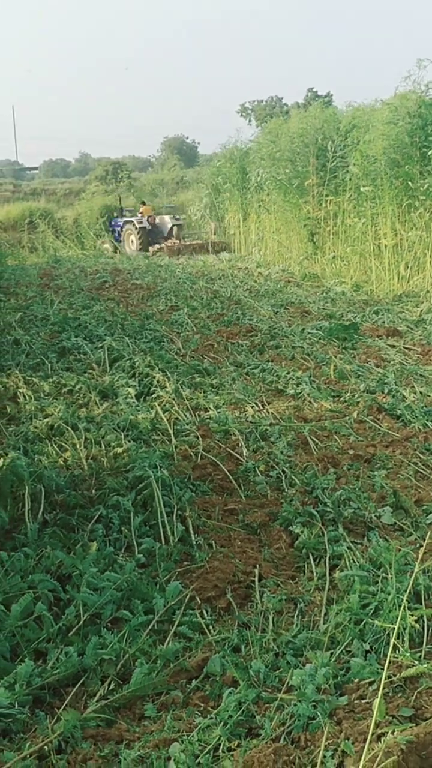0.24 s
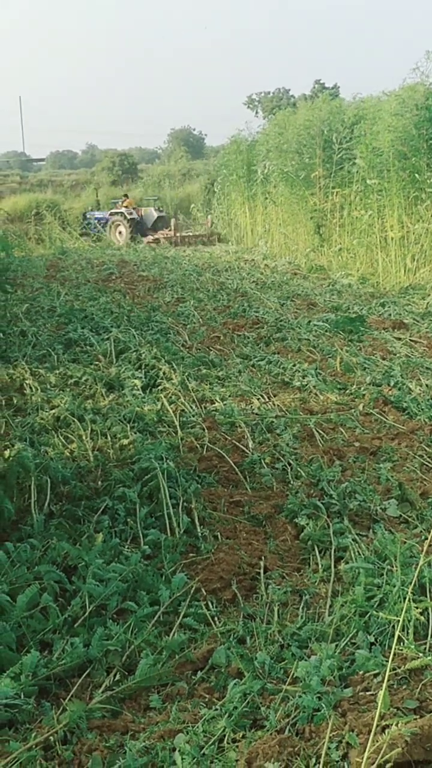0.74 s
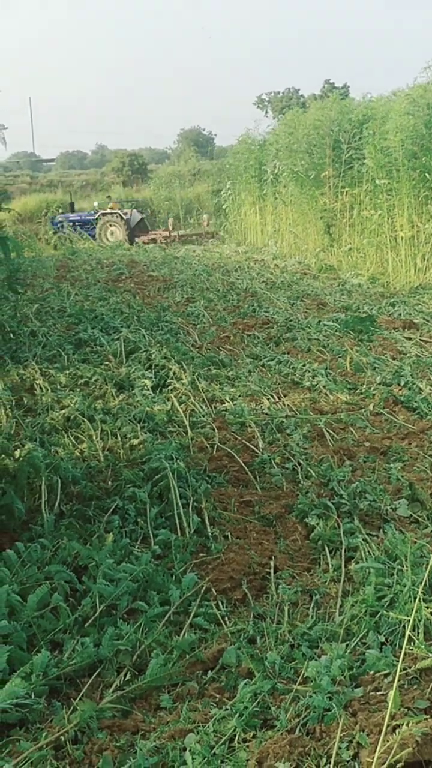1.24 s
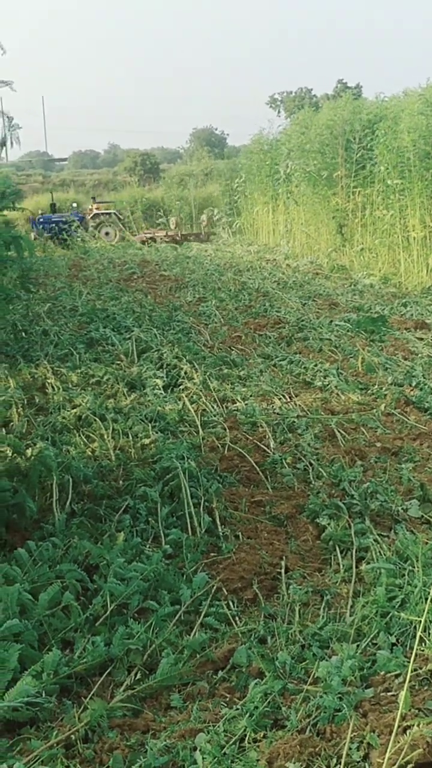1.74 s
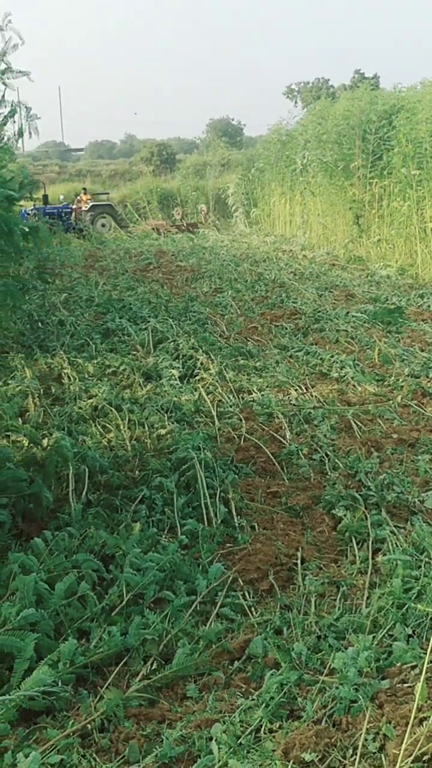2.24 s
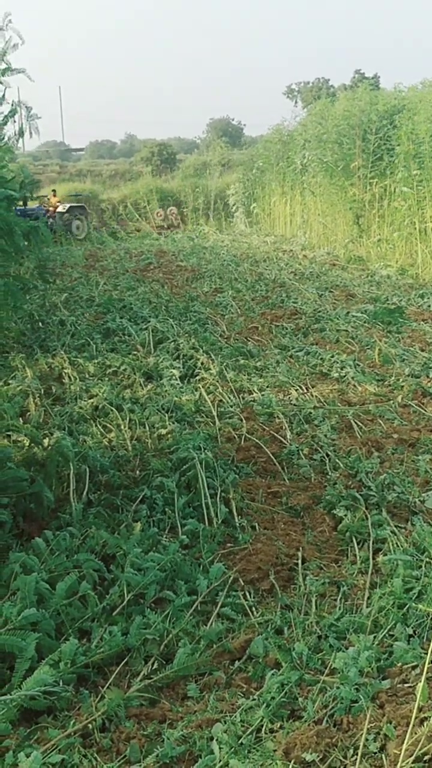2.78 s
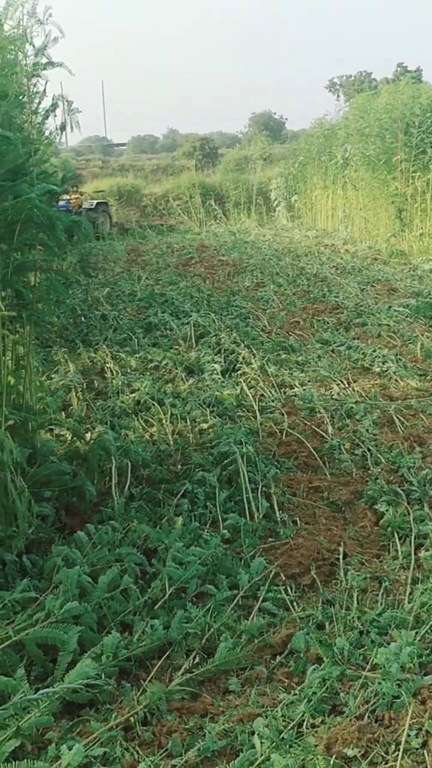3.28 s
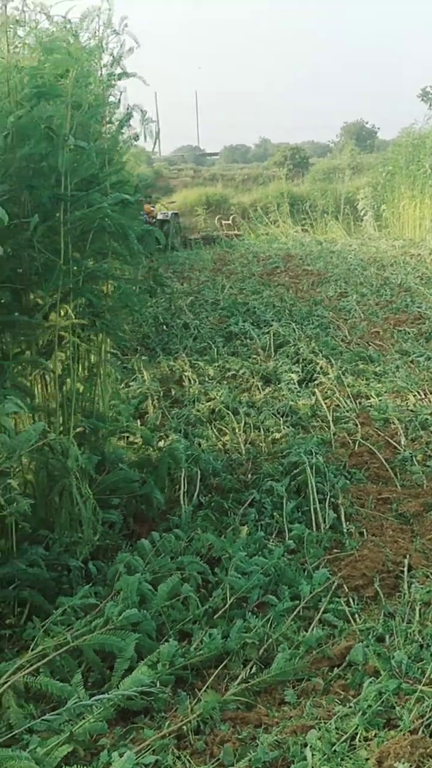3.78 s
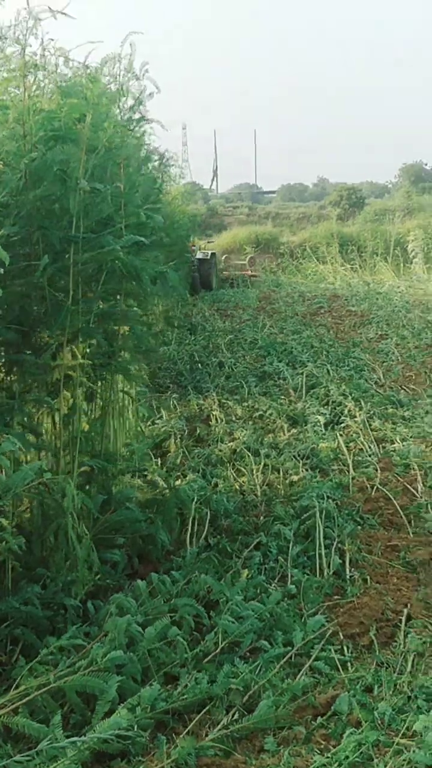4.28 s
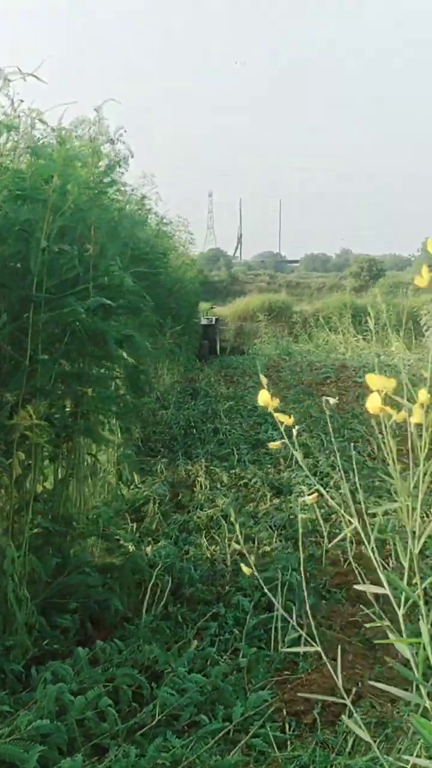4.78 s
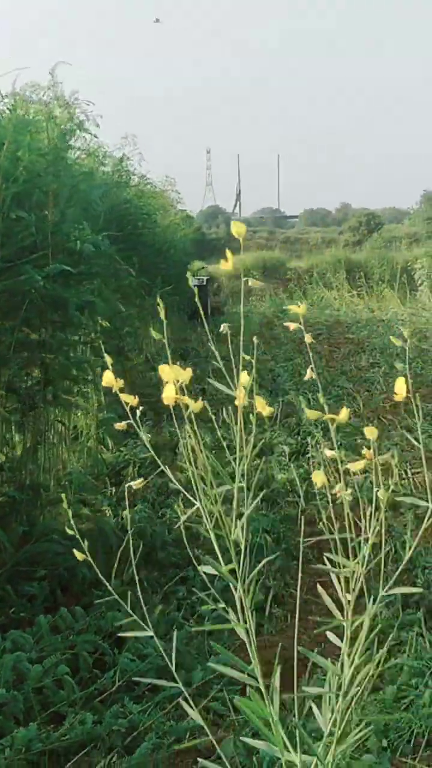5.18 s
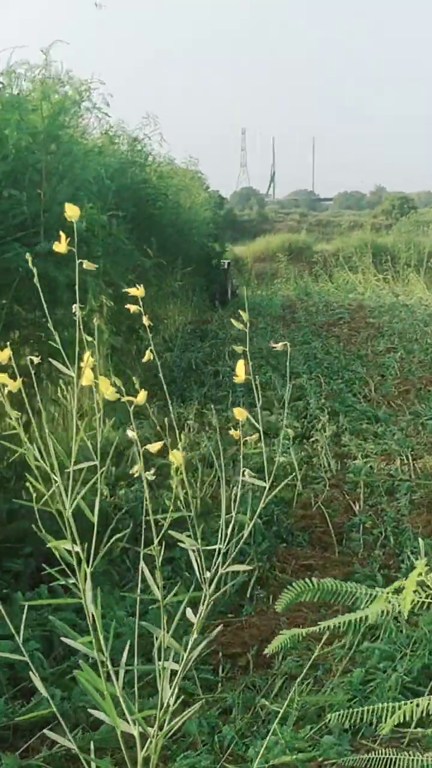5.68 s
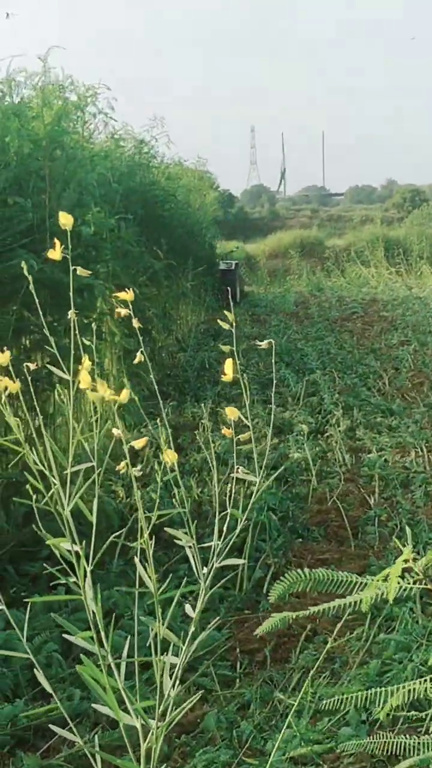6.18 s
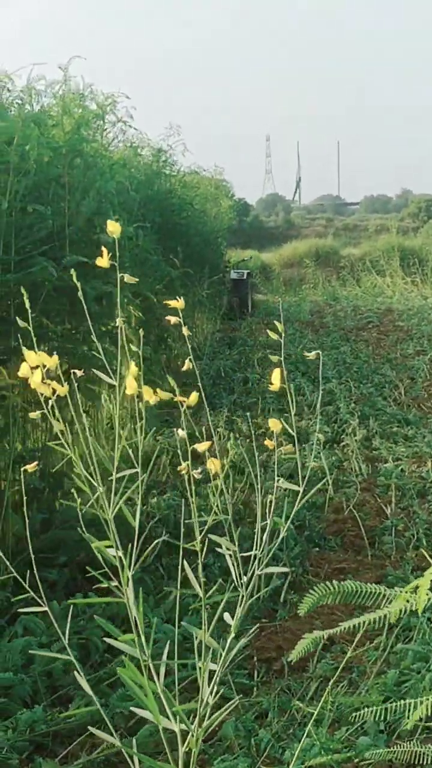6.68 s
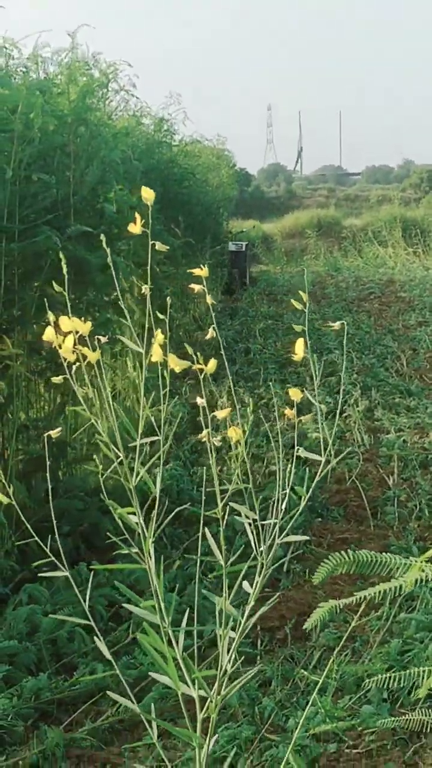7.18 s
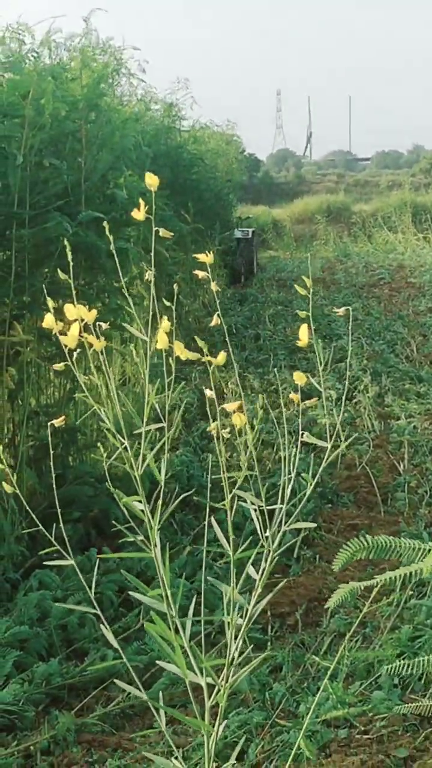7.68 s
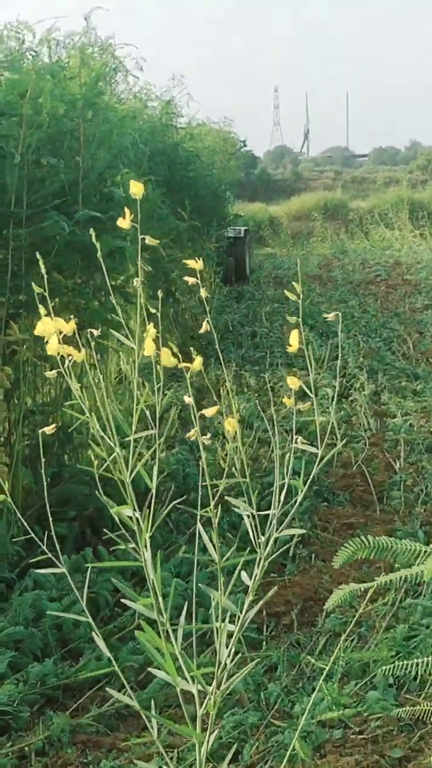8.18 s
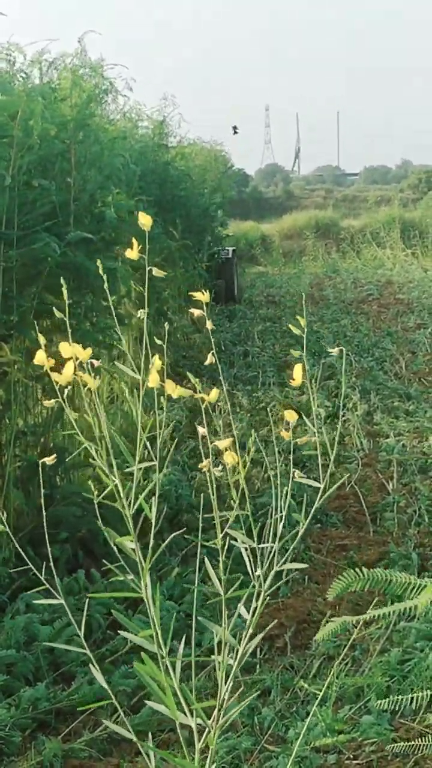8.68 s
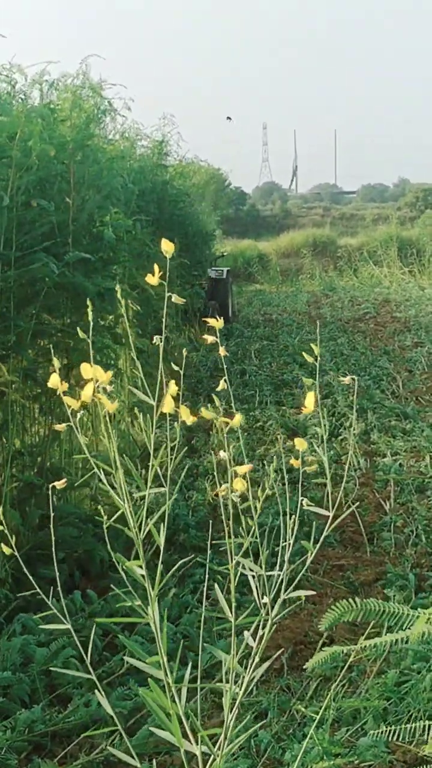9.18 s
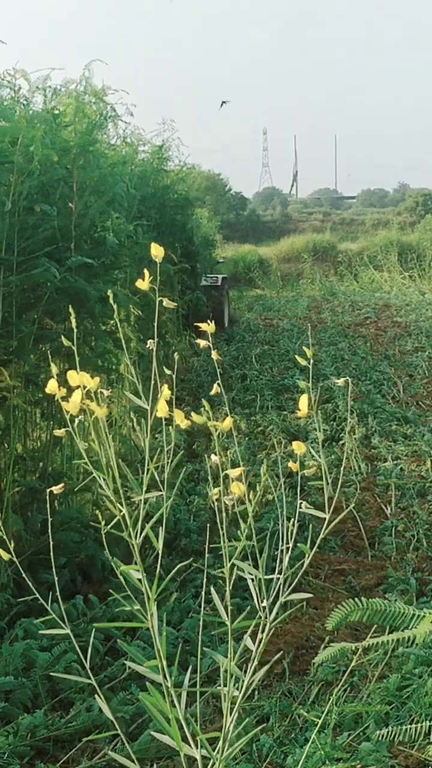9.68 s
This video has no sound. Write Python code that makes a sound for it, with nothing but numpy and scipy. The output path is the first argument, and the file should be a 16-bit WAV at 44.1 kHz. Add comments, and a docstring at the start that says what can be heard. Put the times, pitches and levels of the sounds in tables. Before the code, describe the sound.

In an open field, a distant diesel tractor runs with a pulsing, knocking beat and faintly whining gears, dipping in speed before recovering. Midway, soft leaf rustles and small stalk snaps come right by the microphone, followed by two brief reedy bird calls. In the second half the engine gets clearly louder as it approaches, and the steel harrow behind it clanks twice in quick succession.

```python
"""From the edge of a crop field: a diesel tractor drags a harrow round the far end, gears whining faintly.
Each firing gives an exhaust thump, a bark, a spit of gas and a knock in the block. A small bird chirps
in a far hedge; the engine labours in the turn, slowest at 2.4 s, then picks up. Leaves brush and stalks
snap close to the microphone, and a reedy bird calls twice. From 6 s the tractor comes clear of the crop
and grows louder on its way back; at 9 s the harrow clanks."""
import sys
import numpy as np
from scipy import signal
from scipy.fft import rfft, irfft
from scipy.io import wavfile

SR = 44100
rng = np.random.default_rng(int(sys.argv[2]) if len(sys.argv) > 2 else 0)


def transcribe(signal):
    """Save signal, clipped to [-1, 1], as a 16-bit WAV file at the path in sys.argv[1]."""
    frames = np.atleast_2d(signal).T
    limited = np.clip(frames, -1, 1)
    pcm = np.round(limited * 32767).astype(np.int16)
    wavfile.write(sys.argv[1], SR, pcm)


N = 438354
T = np.arange(N) / SR


def amp(db):
    """Decibels to gain."""
    return 10 ** (np.asarray(db) / 20)


def unit(x):
    """Scales to rms 1."""
    return x / np.sqrt(np.mean(x ** 2) + 1e-20)


def curves(rows):
    """Each column after time_s, interpolated sample by sample."""
    time_s, *columns = np.transpose(rows)
    return [np.interp(T, time_s, column) for column in columns]


def bell(centre, width, x=T):
    """A smooth hump, 1 at the centre and 1/e one width to either side."""
    return np.exp(-((x - centre) / width) ** 2)


def add(mix, start_s, sound):
    """Lays a sound into the mix."""
    part = mix[max(round(start_s * SR), 0):][:len(sound)]
    part += sound[:len(part)]


def wander(rate_hz):
    """Random drift of rms 1, up to about the given rate."""
    hz = np.fft.rfftfreq(N, 1 / SR)
    return unit(irfft(rfft(rng.standard_normal(N)) / (1 + (hz / rate_hz) ** 4), N))


def band(x, low_hz, high_hz):
    """Gentle band-pass."""
    return signal.sosfilt(signal.butter(2, [low_hz, high_hz], "band", fs=SR, output="sos"), x)


def colour(x, spectrum, size=4096):
    """Causal filter with the given spectral shape; the result has rms 1."""
    hz, db = np.transpose(spectrum)
    grid = np.log(np.fft.rfftfreq(size, 1 / SR) + 1)
    log_gain = np.log(amp(np.maximum(np.interp(grid, np.log(hz + 1), db), -70)))
    cepstrum = irfft(log_gain)[:size // 2] * np.r_[1, np.full(size // 2 - 1, 2)]
    impulse = irfft(np.exp(rfft(cepstrum, size)))
    return unit(signal.oaconvolve(x, impulse)[:N])


# The open field's ambience: freq_hz, relative_db
AIR_SPECTRUM = [(20, 7.5), (50, -17.5), (150, 1.5), (500, 6.5), (2000, 6.5), (5000, -12.5), (7500, -1),
                (9000, -27.5), (11000, -28), (14000, -13), (15700, -7.5)]

def air(level_db=-61.5):
    """Still air over the crop, a faint steady hush."""
    return amp(level_db) * colour(rng.standard_normal(N), AIR_SPECTRUM)


# A small bird in a far hedge: start_s, length_s, start_hz, end_hz, level_db
HEDGE_CHIRPS = [(1.031, 0.0306, 6100, 5810, -66.5), (1.15, 0.03524, 6210, 5750, -64),
                (1.299, 0.03186, 6080, 5704, -61)]

def hedge_bird():
    """Thin, pure notes that slide downward."""
    out = np.zeros(N)
    for start_s, length_s, start_hz, end_hz, db in HEDGE_CHIRPS:
        progress = np.arange(0, 1, 1 / (length_s * SR))
        cycles = np.cumsum(start_hz + (end_hz - start_hz) * progress) / SR
        add(out, start_s, amp(db) * np.sin(np.pi * progress) * np.sin(2 * np.pi * cycles))
    return out


# A louder bird in the field: start_s, length_s, pitch_hz, level_db
REEDY_CALLS = [(5.211, .08, 1464, -44.5), (6.65, 0.1417, 1469, -38.5)]
# The overtones of its throat: harmonic, relative_db
THROAT_HARMONICS = [(2, 4), (3, -17.5), (4, -12.5), (5, -13)]

def reedy_bird(droop=0.0987, rasp=0.02453):
    """A short reedy call that swells, then drops in pitch as it ends."""
    out = np.zeros(N)
    for start_s, length_s, pitch_hz, db in REEDY_CALLS:
        progress = np.arange(0, 1, 1 / (length_s * SR))
        bend = 1 - droop * progress ** 8 + rasp * wander(364.2)[:len(progress)]
        cycles = np.cumsum(pitch_hz * bend) / SR
        voice = sum(amp(level) * np.sin(2 * np.pi * k * cycles) for k, level in THROAT_HARMONICS)
        add(out, start_s, amp(db) * unit(voice) * np.sin(np.pi * progress ** 1.251))
    return out


# Leaf rustle at close range: freq_hz, relative_db
LEAF_SPECTRUM = [(1500, -6.5), (3000, 3.5), (5500, 2.5), (8000, 5.5), (10000, -1.5), (12500, -9.5),
                 (14000, 4.5), (15500, 3.5)]
# Leaves brushing past the microphone: centre_s, width_s, level_db
LEAF_BRUSHES = [(0.319, 0.1196, -64), (3.644, 0.1016, -65), (3.78, 0.062, -50.5), (4.158, 0.0515, -65.5),
                (4.573, 0.16145, -53.5), (4.888, 0.1417, -58.5), (5.233, 0.1053, -55.5),
                (5.817, 0.1371, -56.5)]
# Stalks snapping: start_s, gain_db, decay_s, low_hz, high_hz
STALK_SNAPS = [(.583, -37.5, 0.0088, 3000, 8995), (4.014, -33, 0.00296, 12500, 16900),
               (4.138, -38.5, 0.00308, 11000, 16900), (4.338, -24.5, 0.003943, 1800, 16980),
               (6.122, -43, 0.001993, 10000, 17000)]

def leaves(grain_db=3.0):
    """Leaves slide by in soft, grainy swells, and a few stalks snap."""
    rustle = colour(rng.standard_normal(N), LEAF_SPECTRUM)
    swells = sum(amp(db) * bell(centre_s, width_s) for centre_s, width_s, db in LEAF_BRUSHES)
    out = rustle * swells * amp(grain_db * wander(198.3))
    t = T[:SR // 16]
    for start_s, db, decay_s, low_hz, high_hz in STALK_SNAPS:
        snap = amp(db) / 2 * np.exp(-t / decay_s) * rustle[round(start_s * SR):][:len(t)]
        add(out, start_s, band(snap, low_hz, high_hz))
    return out


# The harrow, behind the approaching tractor: start_s, peak_db, pitch_hz
HARROW_CLANKS = [(9.011, -21.5, 3610), (9.077, -20, 2883)]
# Its ringing steel: pitch_ratio, relative_db, t60_s
STEEL_MODES = [(.76, 1, 0.0254), (.92, 1.5, 0.03324), (1, 1.5, .03), (1.23, -2.5, 0.02013)]

def harrow():
    """Loose steel parts knock together and ring briefly."""
    out, t = np.zeros(N), T[:SR // 16]
    for start_s, peak_db, pitch_hz in HARROW_CLANKS:
        ring = sum(amp(db - 60 * t / t60_s) * np.sin(2 * np.pi * (pitch_hz * ratio * t + rng.random()))
                   for ratio, db, t60_s in STEEL_MODES)
        add(out, start_s, amp(peak_db) * ring / abs(ring).max())
    return out


# Gear whine carrying across the field: centre_s, width_s, cycles_per_firing, level_db
GEAR_WHINES = [(0.104, 0.676, 31.06, -55.5), (0.288, 0.1396, 20.65, -51), (0.884, 0.13, 31.45, -49.5),
               (1.092, 0.1767, 20.5, -48.5), (1.557, 0.1957, 20.65, -53), (2.07, 0.1407, 20.9, -53),
               (2.547, 0.2529, 20.8, -52.5), (2.682, 0.0726, 41.5, -50.5), (3.798, 0.133, 31.06, -50),
               (6.35, 1, 31.35, -49), (7.582, 0.3695, 31.35, -50.5), (8.995, 0.5742, 31.35, -45),
               (9.849, 0.2903, 31.35, -47.5)]

def gears(firings, waver_rad=0.659):
    """Meshing teeth whine in step with the engine, in soft swells."""
    out = np.zeros(N)
    for centre_s, width_s, multiple, db in GEAR_WHINES:
        whine = np.sqrt(2) * np.sin(2 * np.pi * multiple * firings + waver_rad * wander(30))
        out += amp(db) * bell(centre_s, width_s) * whine
    return out


# The diesel slows in the turn and picks up again: time_s, firing_hz
ENGINE_SPEED = [(0.0, 41.4), (1.05, 41.85), (1.3, 38.93), (1.9, 37.8), (2.4, 35.65), (3.6, 41.95),
                (3.9, 43.88), (4.3, 44.83), (4.8, 45.15), (6.0, 44.51), (6.6, 43.41), (7.2, 42.92),
                (7.8, 41.79), (8.4, 41.93), (9.1, 41.28), (9.94, 41.32)]

def firing_rate():
    """Cylinder firings per second, sample by sample."""
    return curves(ENGINE_SPEED)[0]


# The engine's loudness at the microphone, from load and distance: time_s, relative_db
ENGINE_LOAD = [(0, -14.5), (0.3, -13.0), (1.1, -14), (1.7, -17), (2.4, -15), (2.7, -9.5), (3.4, -9.5),
               (3.8, -7.5), (4.3, -10.5), (5.05, -13), (5.2, -10.0), (6, -10.5), (6.12, -4.5), (6.7, -3.5),
               (7, -5.5), (8.6, -3.0), (9.6, -0.5), (9.94, 1)]

def load_gain(full_load_db, follow):
    """Gain of a noisy engine layer, which moves `follow` dB for each dB of load."""
    return amp(full_load_db + follow * curves(ENGINE_LOAD)[0])


# Unusually hard firings: centre_s, extra_db
HARD_FIRINGS = [(3.076, 6.5), (3.522, 6.5), (6.654, 5.5), (6.678, 6.5), (7.352, 8), (7.683, 6), (7.849, 10),
                (8.088, 4.5), (8.233, 0.5), (8.495, 3), (8.590, 3.5), (8.854, 2), (8.879, 7), (9.047, 7.5),
                (9.412, 3.5), (9.461, 6.5), (9.484, 4.5), (9.678, 9), (9.846, 2)]

def hard_gain(share, width_s=0.00501):
    """A layer jumps by its share of each hard firing's extra decibels."""
    return amp(share * sum(db * bell(centre_s, width_s) for centre_s, db in HARD_FIRINGS))


# The side of the tractor turned to the microphone: time_s, heading
# (0 rear quarter, 1 flank, 2 front quarter behind the crop, 3 in the clear, 4 nose)
TRACTOR_HEADING = [(0, 0.395), (1.1, 0.2705), (1.6, 0.8484), (3.35, 0.9866), (3.8, 1.7189), (5.9, 1.91),
                   (6.15, 2.6), (7.6, 3.06), (8.8, 4.0213), (9.94, 4.0919)]

def facing(x, spectra):
    """The tone crossfades from one heading's spectrum to the next as the tractor turns."""
    heading, = curves(TRACTOR_HEADING)
    return sum(np.maximum(1 - abs(heading - k), 0) * colour(x, shape) for k, shape in enumerate(spectra))


# What each side throws toward the microphone, a row per heading: knock_db, spit_db, growl_db
SIDE_LEVELS = [(-0.1164, 0.1721, -1.8339), (0.433, -1.3335, -2.5038), (0.0521, -0.4838, 3),
               (-2.6294, 3, 0.72), (0.7284, 0.0458, 0.5422)]

def side_gains():
    """Gains of knock, spit and growl as the tractor turns."""
    heading, = curves(TRACTOR_HEADING)
    return [amp(np.interp(heading, np.arange(len(db)), db)) for db in np.transpose(SIDE_LEVELS)]


# Sound that reaches the microphone in a straight line: time_s, power_share
DIRECT_SHARE = [(0, 0.5966), (1.2, 0.3708), (1.8, 0.9438), (3.2, 1), (4.2, 0.671), (5.9, 0.6858),
                (6.2, 0.8946), (9.94, 0.9175)]

def crop_scatter(x):
    """The crop smears the rest of the beat into steady noise."""
    direct, = curves(DIRECT_SHARE)
    return np.sqrt(direct) * x + np.sqrt(1 - direct) * rng.standard_normal(N)


def puffs(firings, start, rise, fall, tail, tail_fall, base, spread_db):
    """Turbulence gated by each firing: quick swell and fall, longer tail, steady base (times in cycles)."""
    index, phase = np.divmod(firings - start + 2, 1)
    strength = amp(spread_db * rng.standard_normal(512))[index.astype(int)]
    after = np.maximum(phase - rise, 0)
    swell = np.sin(np.pi / 2 * np.minimum(phase / rise, 1)) ** 2
    gate = swell * (strength * np.exp(-after / fall) + tail * np.exp(-after / tail_fall))
    return unit(np.hypot(gate, base) * rng.standard_normal(N))


def pops(firings, start, jitter_s, spread_db):
    """One pressure pop each time the exhaust valve opens, never quite alike."""
    openings = np.flatnonzero(np.diff(np.floor(firings - start)))
    late, size = rng.standard_normal((len(openings), 2)).T
    train = np.zeros(N)
    train[np.clip(openings + (late * jitter_s * SR).astype(int), 0, N - 1)] = amp(spread_db * size)
    return unit(train)


# The silencer's low end: freq_hz, relative_db
ROAR_SPECTRUM = [(30, -17), (55, -36), (80, -2.5), (130, 6), (200, 10.5), (240, -1), (290, -13.5),
                 (400, -40)]

def silencer_roar(firings):
    """Gas rushes through the silencer in a low, gently pulsing roar."""
    gas = puffs(firings, start=0.30965, rise=0.12, fall=1.0,
                tail=0.1976, tail_fall=0.87, base=1.0, spread_db=1.0)
    return load_gain(-37, follow=0.57746) * colour(gas, ROAR_SPECTRUM)


# The silencer's low midrange: freq_hz, relative_db
GROWL_SPECTRUM = [(170, -45.5), (250, -6), (285, -3), (335, 2), (400, -3), (480, -10.5), (600, -19.5),
                  (900, -51)]

def silencer_growl(firings):
    """Churning gas and valve pops resound in the silencer."""
    churn = puffs(firings, start=0.1744, rise=0.1709, fall=0.4285,
                  tail=0.215, tail_fall=0.9, base=1.0, spread_db=1.5)
    valve = pops(firings, start=0.35687, jitter_s=0.0002386, spread_db=1.0)
    return load_gain(-43.5, follow=0.96876) * colour(churn + 0.4459 * valve, GROWL_SPECTRUM)


# Brief raspy patches in the exhaust's treble: centre_s, width_s, centre_hz, bandwidth_hz, level_db
RASP_BANDS = [(2.03, 0.2298, 8729, 3000, -64.5), (3.099, 0.4176, 10750, 3500, -65),
              (6.449, 0.371, 4043, 599, -54), (8.342, 0.1273, 5899, 600, -55.5)]

def exhaust_rasp(firings):
    """Crisp ticks of gas, one to a firing, that come and go."""
    ticks = puffs(firings, start=0.26385, rise=0.1069, fall=0.1353,
                  tail=0.079, tail_fall=0.474, base=0.0362, spread_db=2.0)
    return sum(amp(db) * bell(centre_s, width_s) * unit(band(ticks, hz - span_hz / 2, hz + span_hz / 2))
               for centre_s, width_s, hz, span_hz, db in RASP_BANDS)


# The spit at the microphone, a list per heading: freq_hz, relative_db
SPIT_SPECTRA = [
    [(1940, -12), (3300, -16), (3640, -8.5), (3960, -1), (4180, -23.5), (4670, -10.5), (5050, -18),
     (5610, -9), (6400, -22.5), (7060, -13.5), (7630, -8), (8760, -11.5), (9790, -22.5), (14900, -39),
     (15800, -32)],
    [(1940, -23.5), (3300, -7), (3590, -11), (3860, -1), (4610, -5.5), (5290, -5.5), (5540, -10),
     (5990, -5), (6830, -13), (7390, -5), (8820, -7), (11000, -26), (12100, -26.5), (14400, -24.5),
     (15800, -16)],
    [(1940, -40), (3300, -11), (3690, 4), (4350, -13), (4860, -5), (5250, -11), (5680, -8.5), (6310, -14),
     (7740, -5.5), (11200, -23), (13100, -27.5), (15000, -14), (15800, -16.5)],
    [(1940, -50), (3300, -14), (3790, 1.5), (4430, -10.5), (4700, -20.5), (5090, -6), (5430, -19.5),
     (5680, -14), (6870, -19), (7440, -13.5), (8930, -21.5), (10200, -18.5), (11400, -30.5), (14400, -24),
     (15800, -30)],
    [(1940, -29.5), (3300, -4), (3640, 4), (3940, -18), (4260, 2.5), (4520, -10), (4920, -1.5), (5360, -13),
     (5870, -5.5), (7060, -12.5), (8310, -8), (8930, -14.5), (12300, -21.5), (15100, -17), (15800, -14.5)],
]
# A close reflection that ripples the treble: time_s, delay_ms
REFLECTION_DELAY = [(0, 1.221), (3.4, 1.775), (4.8, 1.47), (6.3, 1.6427), (7.6, 1.6155), (9.94, 1.5)]

def exhaust_spit(firings, waver_ms=0.12933, reflection=0.66):
    """Each firing spits gas; a reflection follows, its delay wavering in the hot exhaust."""
    gas = puffs(firings, start=0.2695, rise=0.06296, fall=0.16534,
                tail=0.293, tail_fall=0.971, base=0.213, spread_db=3.0)
    spit = facing(crop_scatter(gas), SPIT_SPECTRA)
    delay_ms = curves(REFLECTION_DELAY)[0] + waver_ms * wander(15)
    reflected = np.interp(T - delay_ms / 1000, T, spit)
    return load_gain(-45.5, follow=1.0409) * hard_gain(0.252) * unit(spit + reflection * reflected)


# The engine block at the microphone, a list per heading: freq_hz, relative_db
KNOCK_SPECTRA = [
    [(660, -34), (1120, -7), (1140, -20.5), (1160, -4), (1210, -15.5), (1260, 3.5), (1320, -17.5),
     (1370, 3), (1570, -6), (1760, -5.5), (2000, -20.5), (2140, -13), (2250, -2.5), (2920, -5),
     (3400, -12.5), (4420, -32), (7480, -120)],
    [(660, -26), (1120, -2.5), (1240, -8), (1310, -16), (1370, -4), (1550, 0.5), (1670, -4), (1820, -17),
     (2030, -22), (2220, -10.5), (2400, -9), (2650, 1), (2720, -5), (3060, -12.5), (3400, -15.5),
     (4420, -46), (7480, -120)],
    [(660, -43), (1120, -19), (1190, -1.5), (1350, -2), (1430, -1), (1510, -12), (1640, -13.5), (1870, -5),
     (2100, -19), (2180, -11.5), (2370, -3.5), (2500, 2.5), (2750, -9.5), (3010, -8.5), (3400, -17),
     (4420, -46.5), (7480, -120)],
    [(660, -28), (1120, -12.5), (1210, -7), (1280, -4), (1360, 1.5), (1420, 3), (1490, -3.5), (1780, -10.5),
     (2100, -11.5), (2210, -6.5), (2390, -4.5), (2650, -1.5), (3010, -5), (3400, -11.5), (4420, -48.5),
     (7480, -120)],
    [(660, -33), (1120, -22.5), (1180, -10), (1250, -0.5), (1310, 0.5), (1590, -3), (1800, -12), (2000, -6),
     (2290, -14), (2460, -3.5), (2700, 3), (3110, -9.5), (3400, -14.5), (4420, -38), (7480, -120)],
]

def block_knock(firings):
    """Each firing rattles the resonances of the engine block."""
    bursts = puffs(firings, start=0.21008, rise=0.1801, fall=0.30926,
                   tail=0.1305, tail_fall=0.988, base=0.40603, spread_db=1.3493)
    knock = facing(crop_scatter(bursts), KNOCK_SPECTRA)
    return load_gain(-36, follow=0.7508) * hard_gain(0.292) * knock


# The bark at the microphone, a list per heading: freq_hz, relative_db
BARK_SPECTRA = [
    [(280, -75.5), (480, -20.5), (692, -6), (718, -2), (804, -7), (843, -2.5), (1110, -15), (1150, -20.5),
     (1500, -50), (2530, -120)],
    [(280, -60.5), (480, -40.5), (544, -11.5), (742, 1), (804, 0), (894, 0.5), (972, -1), (1150, -27.5),
     (1500, -26), (2530, -120)],
    [(280, -44), (480, -24), (540, -9), (631, -6.5), (728, -0.5), (951, -6.5), (1020, -20.5), (1150, -12),
     (1500, -39), (2530, -120)],
    [(280, -40), (480, -34), (496, -35.5), (560, -12), (662, -8), (744, 3), (913, -2.5), (1150, -20.5),
     (1500, -58), (2530, -120)],
    [(280, -53), (480, -20.5), (507, -24.5), (550, -13), (744, 1.5), (920, -3.5), (1090, -20),
     (1150, -17.5), (1500, -37), (2530, -120)],
]

def exhaust_bark(firings):
    """A valve pop and a puff of gas leave the pipe as a midrange bark."""
    gas = puffs(firings, start=0.25945, rise=0.1296, fall=0.13766,
                tail=0.3375, tail_fall=0.8674, base=0.3363, spread_db=3.0)
    valve = pops(firings, start=0.365, jitter_s=0.00018216, spread_db=2.6342)
    bark = facing(crop_scatter(unit(gas + valve)), BARK_SPECTRA)
    return load_gain(-33, follow=1.0952) * hard_gain(1) * bark


# The exhaust drone across the field, tilted about order 3: time_s, relative_db, tilt_db_per_order
EXHAUST_DRONE = [(0, -6.5, -9.5), (1, -5.0, -10), (1.5, -6, -6.5), (2.1, -3, -3.5), (2.8, -2.5, -4),
                 (3.3, -2, -5.5), (3.8, 1, -7), (4.3, -2.5, -9.5), (5, -1.5, -8.5), (5.95, 0.5, -7.5),
                 (6.15, 4, -6.5), (6.8, 4.5, -6), (7.6, 3.5, -5), (8.6, 2.5, -3.5), (9.94, 4, -4)]
# What the pipe passes as the orders slide through it: freq_hz, gain_db
PIPE_RESPONSE = [(70, -60.5), (78, -43), (88, -41.5), (108, -41), (120, -30), (128, -32.5), (136, -35),
                 (150, -34.5), (165, -41), (176, -36.5), (190, -30.5), (208, -34), (226, -42.5)]
# The drone hollows out or swells in one band: centre_s, width_s, centre_hz, width_hz, gain_db
DRONE_SWELLS = [(0.526, 0.1555, 94.9, 50.3, -12.5), (1.197, 0.1516, 122.7, 20.6, -18.5),
                (3.0, 0.612, 159.6, 13.94, 8.5), (6.601, 0.4406, 174.6, 13.82, 3.5)]

def exhaust_thump(firings, uneven=0.0818, waver_db=0.616, fundamental_db=-71, gain_db=-0.9143):
    """Orders 2 to 5 of the exhaust pulses, coloured by the pipe, over a faint tone at the firing rate."""
    lag_cycles, pipe_cycles = 0.67603, 0.2315
    level_db, tilt_db = curves(EXHAUST_DRONE)
    drone = np.zeros(N)
    for order in range(2, 6):
        hz = order * firing_rate()
        pipe_db = np.interp(hz, *np.transpose(PIPE_RESPONSE))
        swell_db = sum(db * bell(centre_s, width_s) * bell(centre_hz, width_hz, hz)
                       for centre_s, width_s, centre_hz, width_hz, db in DRONE_SWELLS)
        order_db = level_db + tilt_db * (order - 3) + pipe_db + swell_db + waver_db * wander(4.037)
        cycles = order * (firings - lag_cycles) + pipe_cycles
        drone -= np.sqrt(2) * amp(order_db) * np.cos(2 * np.pi * cycles)
    fundamental = amp(fundamental_db) * np.cos(2 * np.pi * firings)
    return amp(gain_db) * drone * (1 + uneven * wander(24.75)) + fundamental


def scene():
    """The tractor and the field around it, from one spot in mono."""
    firings = np.cumsum(firing_rate()) / SR  # this running count keeps the engine layers in step
    knock_gain, spit_gain, growl_gain = side_gains()
    tractor = (exhaust_thump(firings) + exhaust_bark(firings)
               + knock_gain * block_knock(firings) + spit_gain * exhaust_spit(firings)
               + silencer_roar(firings) + growl_gain * silencer_growl(firings)
               + exhaust_rasp(firings) + gears(firings))
    return (tractor + harrow() + leaves() + reedy_bird() + hedge_bird() + air())[None]


def record(dry, notch_hz=7890, notch_q=45, cutoff_hz=15850):
    """The microphone has one narrow notch, and the highest treble is cut off."""
    notched = signal.lfilter(*signal.iirnotch(notch_hz, notch_q, SR), dry)
    low_pass = signal.firwin(601, cutoff_hz, window=("kaiser", 9), fs=SR)
    return signal.oaconvolve(notched, low_pass[None], "same")


dry = scene()
out = record(dry)
transcribe(out)
```